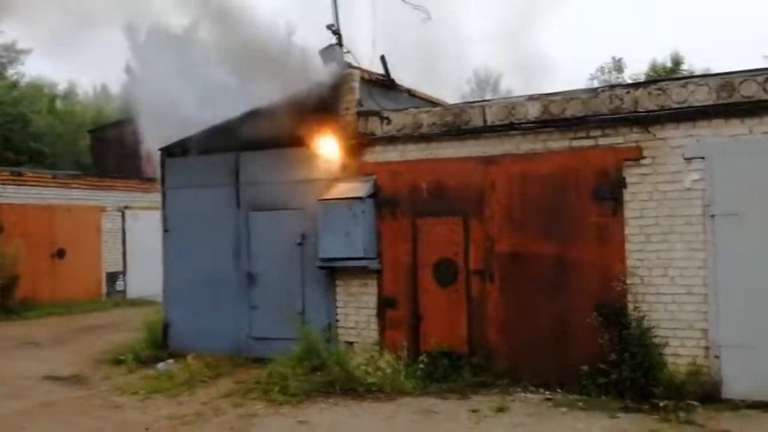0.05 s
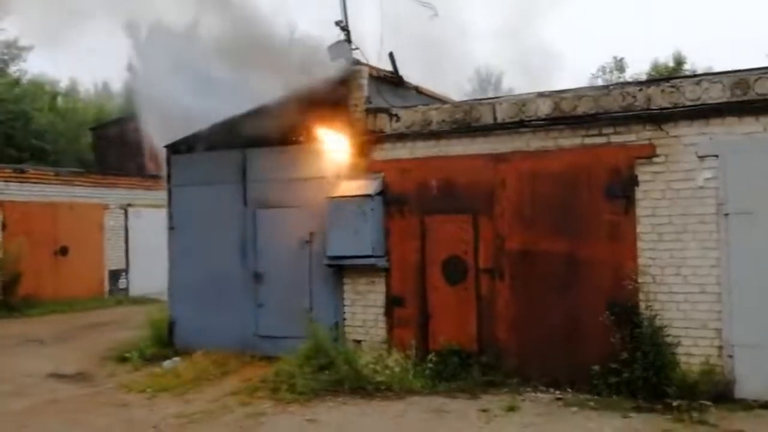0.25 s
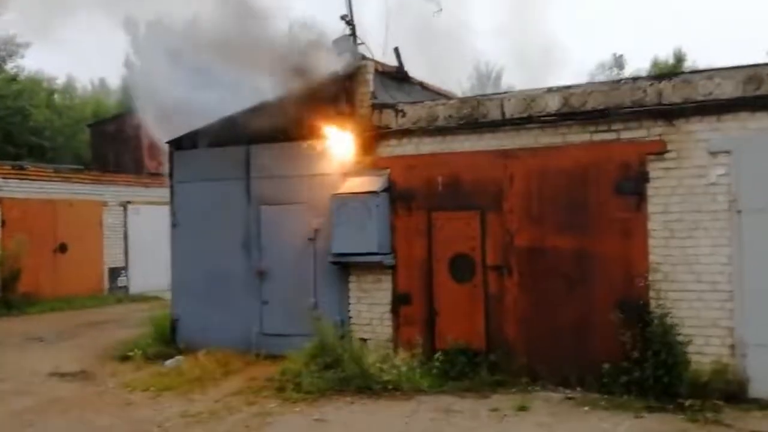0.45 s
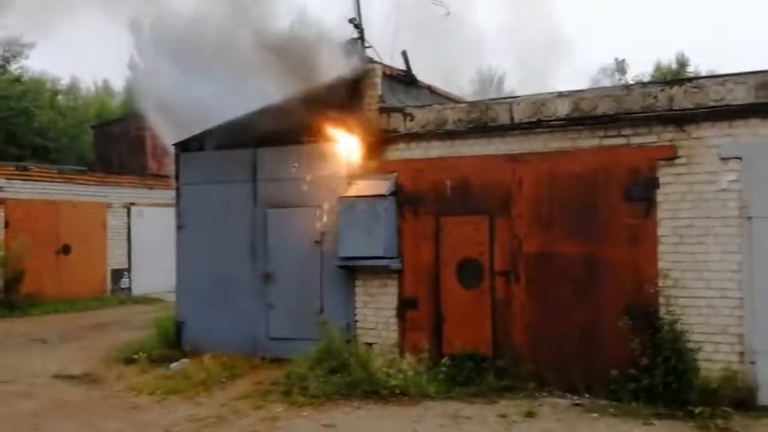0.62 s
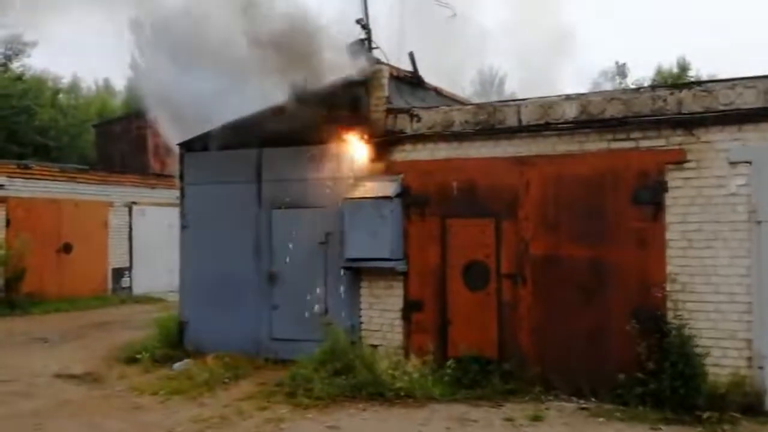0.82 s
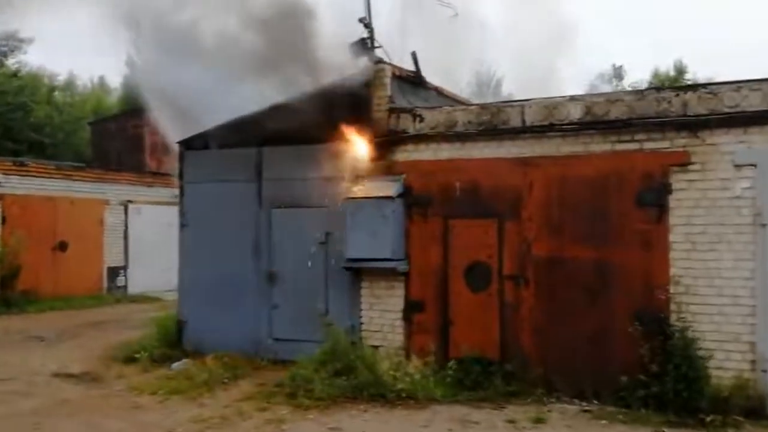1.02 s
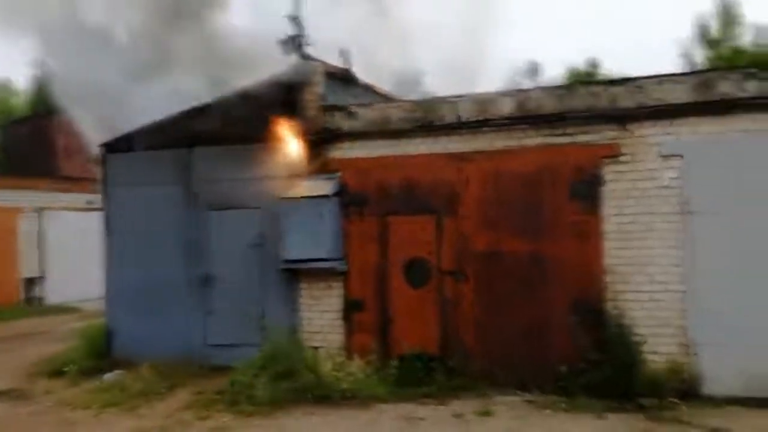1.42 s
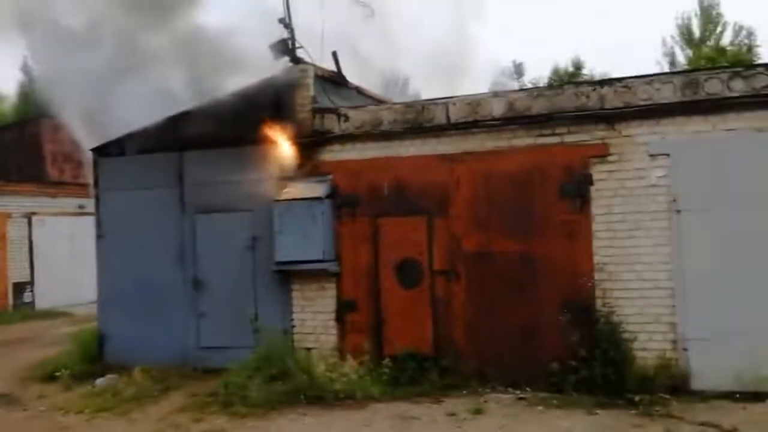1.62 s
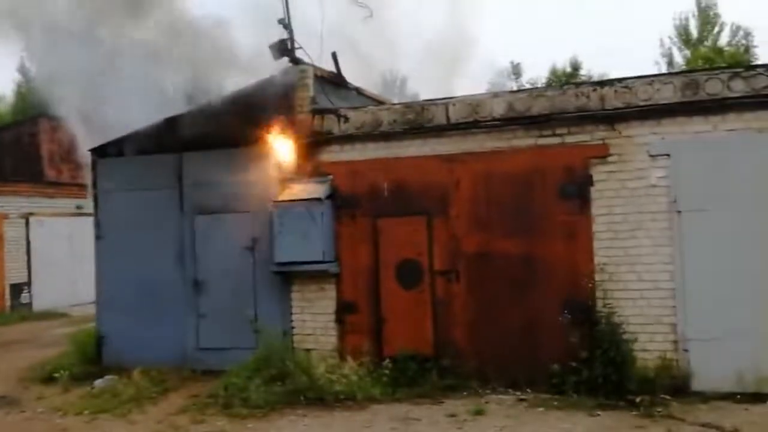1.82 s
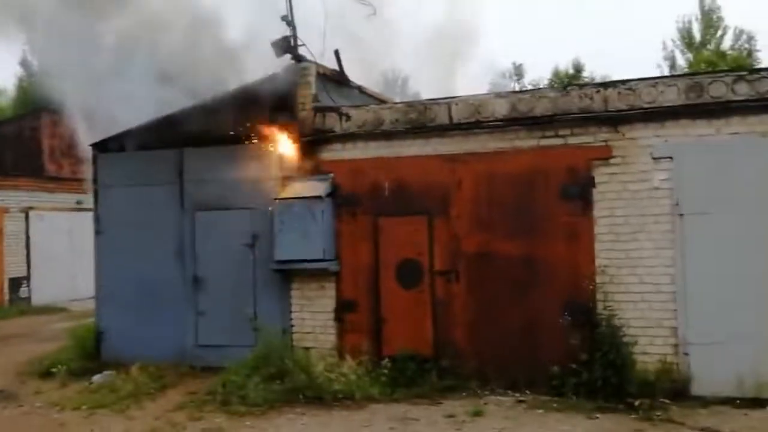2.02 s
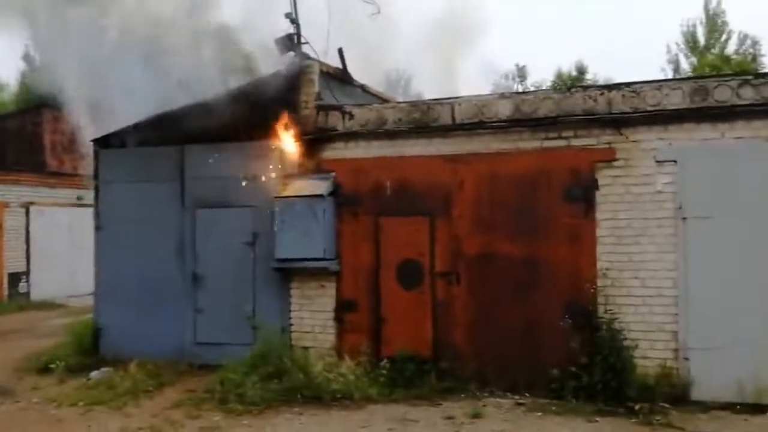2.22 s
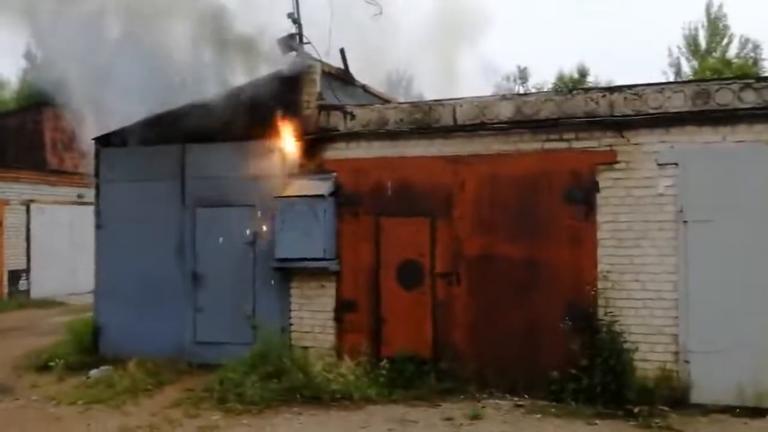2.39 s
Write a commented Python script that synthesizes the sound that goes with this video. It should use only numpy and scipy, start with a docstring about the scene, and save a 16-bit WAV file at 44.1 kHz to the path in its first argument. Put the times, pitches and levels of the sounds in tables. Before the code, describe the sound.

Electrical arcing sizzles on outdoor wiring a few metres away, over a faint hiss and low hum. At 0.2 seconds a snap starts a harsh, crackling sizzle with tiny high squeals, dying down after 1 second. Several sharp snaps follow between 1.2 and 1.5 seconds, with a slight yard echo. At 1.9 seconds another snap sets off a second sizzling burst, fading to faint hiss by about 2.4 seconds.

```python
"""A faint hiss and a low hum: wiring smoulders above a metal box on a garage wall, a few metres away. With a
snap an arc flares up, dies down, then flares again: a harsh sizzle of tiny sparks that throbs with the mains,
with short squeals. The hum is air heated twice per mains cycle. Between the flares the wiring smoulders and
snaps; each snap comes back from a wall of the open yard."""
import sys
import numpy as np
from scipy import signal
from scipy.fft import rfft, irfft
from scipy.io import wavfile

SR = 44100
rng = np.random.default_rng(int(sys.argv[2]) if len(sys.argv) > 2 else 0)


def bounce(signal):
    """Save signal as a 16-bit WAV file at the path given by the first command-line argument."""
    frames = np.transpose(np.atleast_2d(signal))
    limited = np.clip(frames, -1, 1)
    pcm = np.round(limited * 32767).astype(np.int16)
    wavfile.write(sys.argv[1], SR, pcm)


N = 112454
T = np.arange(N) / SR
HZ = np.maximum(np.arange(N // 2 + 1) * SR / N, 1)
MAINS_HZ, CUTOFF_HZ = 50, 14300

# level difference between the channels: (frequency [Hz], left minus right [dB])
BALANCE = [(200, 0), (650, 4), (1300, -1), (2200, -1.5), (4100, 0.1), (7000, 2.5), (8500, 6), (9500, 10),
           (11000, -0.5)]
# reflections, nearest first: (delay [s], relative level [dB])
REFLECTIONS = [(.0029, -14.5), (0.0143, 0)]


def from_db(db):
    """Amplitude grows tenfold for every 20 dB."""
    return 10 ** (np.asarray(db) / 20)


def rms_one(x):
    """Normalisation to unit mean power."""
    return x / np.sqrt(np.mean(x ** 2) + 1e-20)


def at_hz(points):
    """Interpolation over log frequency, at every bin."""
    hz, values = np.transpose(points)
    return np.interp(np.log(HZ), np.log(hz), values)


def drift(rate_hz):
    """Low-passed noise gives a smooth random fluctuation of rms 1."""
    step, settle = 20, 2000
    pole = np.exp(-2 * np.pi * step * rate_hz / SR)
    white = rng.standard_normal(N // step + settle + 2)
    slow = signal.lfilter([1], [1, -2 * pole, pole * pole], white)[settle:]
    return np.interp(np.arange(N) / step, np.arange(len(slow)), rms_one(slow))


def stereo(pair, gain):
    """Partial coherence: two independent signals mix into left and right spectra of one colour."""
    # likeness of left and right: (frequency [Hz], correlation [-1 to 1])
    correlation = [(85, 1.0), (150, 1), (350, 0.96), (620, -0.31), (1400, 0.61), (2200, 0.19), (3000, 1),
                   (6500, 0.51), (8500, 0.32), (11500, 0.98)]
    mid, side = rfft(pair)
    alike = at_hz(correlation)
    sign = np.array([[1], [-1]])
    both = np.sqrt(1 + alike) * mid + sign * np.sqrt(1 - alike) * side
    both *= gain * from_db(sign * at_hz(BALANCE) / 2)
    return both / np.std(irfft(both.mean(0), N))


def noise(spectrum):
    """Spectral shaping turns white noise into coloured stereo noise."""
    return irfft(stereo(rng.standard_normal((2, N)), from_db(at_hz(spectrum))), N)


def smoulder():
    """Steady burning and the open air make a stationary broadband noise."""
    # spectrum of the burning: (frequency [Hz], relative level [dB])
    colour = [(15, -45), (25, -2), (92, 10), (300, -1), (609, -3.5), (1440, 1.5), (5340, -11.5),
              (9010, -5.5), (12000, -51), (13000, -62)]
    return from_db(-57) * noise(colour)


def hum(full_db=-47, waver_db=2, waver_hz=7):
    """Periodic heating: the arc expands the air twice per mains cycle, giving a harmonic series."""
    # envelope of the fundamental: (time [s], level [dB])
    envelope = [(0, -59), (.14, -54.5), (.21, -56), (.265, -43), (.325, -52), (.385, -41.5), (.46, -50),
                (.86, -44.5), (1.06, -55), (1.14, -62), (1.49, -57), (1.63, -69), (1.99, -60),
                (2.09, -41.5), (2.17, -54.5), (2.33, -64.5)]
    # overtones: (harmonic number, full level [dB], fall with the hum [dB/dB], left phase lead [rad])
    overtones = [(2, -56.5, .75, .1), (3, -54, .85, .3), (4, -51.5, 1.2, .8), (5, -61, 1.2, 2.6)]
    db = np.interp(T, *np.transpose(envelope))
    phase = 2 * np.pi * 2 * MAINS_HZ * T + .15 * drift(waver_hz)
    out = from_db(db + waver_db / 2 * drift(waver_hz)) * np.sin(phase)
    for harmonic, level_db, follows, lead in overtones:
        gain = from_db(level_db + follows * np.minimum(db - full_db, 0) + waver_db * drift(waver_hz))
        out = out + gain * np.sin(harmonic * phase + rng.uniform(0, 2 * np.pi) + np.array([[lead], [0]]))
    return np.sqrt(2) * out


def sparks(per_s=3500, spread_db=3, power_share=.27, throb_db=.5, flutter_db=1.14):
    """Shot noise of tiny discharges in a rush of gas, amplitude-modulated at twice the mains frequency."""
    fires = rng.random((2, N)) < per_s / SR
    sizes = from_db(spread_db * np.minimum(rng.exponential(1, (2, N)), 4.5))
    clicks = rms_one(fires * sizes * rng.choice([-1, 1], (2, N)))
    gas = rng.standard_normal((2, N))
    grains = np.sqrt(power_share) * clicks + np.sqrt(1 - power_share) * gas
    throb = np.sin(2 * np.pi * 2 * MAINS_HZ * T)
    return grains * from_db(throb_db * throb + flutter_db * drift(rate_hz=120))


def sizzle(bands=44, roar_top_hz=996, rasp_top_hz=4010, flicker_hz=23.3):
    """Modulated noise: roar, rasp and hiss follow the arc's strength while each narrow band flickers."""
    # spectrum of the arc: (frequency [Hz], relative level [dB])
    colour = [(60, -32), (140, -17.5), (260, -20), (360, -20), (460, -17), (600, -21.5), (850, -19.5),
              (1300, -12.5), (2200, -8), (3000, -10), (4700, -5), (5700, -6.5), (6800, -0.5), (7900, -2),
              (9400, 0), (10200, -3.5), (10550, -13.5), (11900, -10), (12400, -26), (14000, -61)]
    # envelope of the hiss: (time [s], relative level [dB])
    hiss_envelope = [(0, -54), (.15, -50), (.225, -49.5), (.229, -25), (.26, -20.5), (.35, -22),
                     (.385, -27), (.43, -22), (.495, -27), (.52, -17), (.57, -21), (.62, -28), (.66, -22.5),
                     (.77, -24.5), (.83, -23.5), (.995, -23), (1.015, -33.5), (1.1, -41.5), (1.18, -48),
                     (1.21, -45.5), (1.25, -46), (1.42, -48), (1.62, -54), (1.69, -50.5), (1.72, -58.5),
                     (1.908, -55), (1.925, -19), (1.96, -28.5), (2.07, -30.5), (2.16, -21.5), (2.225, -21),
                     (2.32, -41), (2.52, -58.5)]
    # envelope of the rasp and roar below it: (time [s], relative level [dB])
    rasp_envelope = [(0, -49), (.225, -47.5), (.229, -29.5), (.29, -31), (.34, -38.5), (.47, -38),
                     (.56, -34.5), (.7, -37), (.9, -31.5), (.99, -34), (1.1, -47), (1.21, -46.5),
                     (1.38, -48), (1.52, -41), (1.61, -54.5), (1.907, -57), (1.912, -37.5), (2.16, -33.5),
                     (2.25, -37), (2.31, -52.5), (2.39, -53), (2.47, -56.5)]
    # the ground reflection interferes with the direct sound
    comb = 1 + from_db(-19) * np.exp(-2j * np.pi * HZ * REFLECTIONS[0][0])
    spectrum = stereo(sparks(), from_db(at_hz(colour)) * comb)
    centres = CUTOFF_HZ * np.linspace(0, 1, bands) ** 2
    flickering = 0
    for hz, weights in zip(centres, np.eye(bands)):
        depth_db = 2.5 if roar_top_hz < hz < rasp_top_hz else 2  # the rasp sputters most
        band = irfft(spectrum * np.interp(HZ, centres, weights), N)
        flickering += band * rms_one(from_db(depth_db * drift(flicker_hz)))
    spectrum = rfft(flickering)
    hiss_db = np.interp(T, *np.transpose(hiss_envelope))
    rasp_db = np.interp(T, *np.transpose(rasp_envelope))
    roar, below_hiss = (1 / (1 + (HZ / top) ** 6) for top in (roar_top_hz, rasp_top_hz))
    rasp, hiss = below_hiss - roar, 1 - below_hiss
    out = 0
    for share, db in ((roar, rasp_db - 14), (rasp, rasp_db - 2.5), (hiss, hiss_db - 1.5)):
        part = irfft(spectrum * share, N)
        out += from_db(db) * part / np.std(part.mean(0))
    return out


def snaps(decay_s=.0045, wall_thud_db=-5):
    """Transients of the burning wiring: a crack and a thud decay exponentially and return as echoes."""
    # snaps: (time [s], crack level [dB], thud level [dB])
    events = [(0.228, -30, -34), (1.198, -37.5, -63), (1.29, -31.5, -55), (1.3987, -29.5, -31),
              (1.451, -45, -39), (1.5, -41, -44.5), (1.547, -44, -43.5), (1.9089, -29.5, -33),
              (2, -26, -46)]
    # spectrum of the bright crack: (frequency [Hz], relative level [dB])
    crack_colour = [(120, -13), (700, 3), (4000, 2.5), (9300, 8), (10500, -6), (11900, -14), (13300, -52)]
    # spectrum of the dull thud: (frequency [Hz], relative level [dB])
    thud_colour = [(70, -10), (200, 1), (420, 10), (680, -3.5), (1080, 10), (2000, -4.5), (4000, -36)]
    crack, thud = np.zeros(N), np.zeros(N)
    for start, crack_db, thud_db in events:
        for delay, path_db in [(.00015, 0)] + REFLECTIONS:  # direct path first
            age = T - start - delay
            fall = (age >= 0) * np.exp(-np.abs(age) / decay_s)
            from_wall = delay > REFLECTIONS[0][0]
            crack += from_db(crack_db + path_db) * fall
            thud += from_db(thud_db + path_db + wall_thud_db * from_wall) * fall
    return crack * noise(crack_colour) + thud * noise(thud_colour)


def spits(edge_s=.00056):
    """Brief squeals of the arc, and the ringing of the snap at 1.91 s with its wall echo, sound as narrow-band
    noise."""
    # squeals and ringing: (time [s], duration [s], level [dB], centre frequency [Hz], bandwidth [Hz]); the rows
    # from 1.908 to 1.9244 s are the snap at 1.91 s ringing near 4.6 and 9 kHz, and its echo from the wall
    squeals = [(0.264, 0.031, -31.5, 5290, 1300), (0.515, .02, -26.5, 9300, 895),
               (0.53, 0.019, -23.5, 6880, 700), (0.558, 0.033, -36, 2297, 300),
               (0.652, 0.0054, -20.5, 8600, 900), (0.6595, 0.0079, -20, 6680, 300),
               (0.687, 0.0088, -22, 8930, 710), (0.6988, 0.0063, -18, 9260, 500),
               (0.749, 0.02, -26.5, 9580, 600), (1.908, 0.0085, -24.5, 4540, 450),
               (1.9081, 0.0088, -18.5, 8810, 1540), (1.923, 0.0067, -23.5, 4670, 400),
               (1.9244, .004, -20, 9400, 994), (1.9805, 0.0023, -24.5, 4700, 700),
               (2.117, 0.049, -38.5, 2044, 295), (2.145, 0.061, -40, 4590, 400)]
    out = np.zeros((2, N))
    for start, length, db, hz, width_hz in squeals:
        gate = np.clip(np.minimum(T - start, start + length - T) / edge_s + .5, 0, 1)
        phase = 2 * np.pi * hz * T
        squeal = gate * (drift(width_hz / 2) * np.cos(phase) + drift(width_hz / 2) * np.sin(phase))
        pan_db = np.interp(hz, *np.transpose(BALANCE))
        out += from_db(db + np.array([[pan_db], [-pan_db]]) / 2) * squeal * np.std(gate) / np.std(squeal)
    return out


def yard(direct, t60_s=.33, low_cut_hz=316, tail_db=-6):
    """Reverberation: scattering from the row of garages adds a decaying tail without bass."""
    tail = rng.standard_normal((2, SR)) * from_db(-60 * T[:SR] / t60_s)
    tail = signal.sosfilt(signal.butter(2, low_cut_hz, "high", fs=SR, output="sos"), tail)
    tail /= np.sqrt(np.sum(tail ** 2, axis=1, keepdims=True))
    return direct + from_db(tail_db) * signal.fftconvolve(direct, tail, axes=1)[:, :N]


def scene():
    """Superposition: the arc, spits and snaps sound in the yard, over the hum and the smoulder."""
    return yard(sizzle() + spits() + snaps()) + hum() + smoulder()


def record(dry):
    """Band limiting: a steep low-pass removes the highest treble."""
    return signal.sosfilt(signal.ellip(10, .2, 80, CUTOFF_HZ, fs=SR, output="sos"), dry)


dry = scene()
out = record(dry)
bounce(out)
```